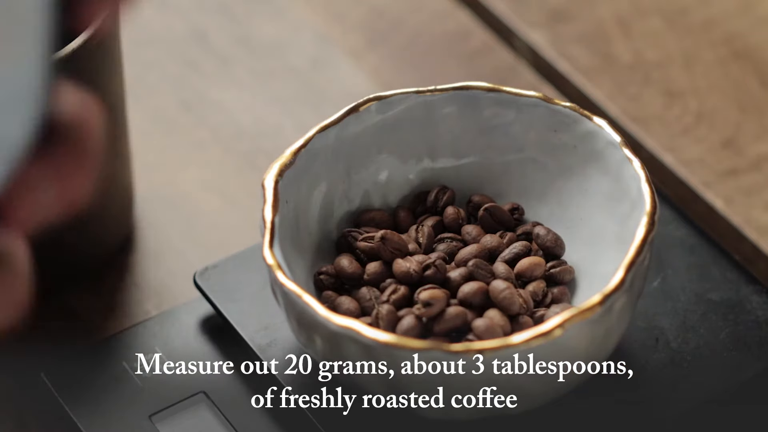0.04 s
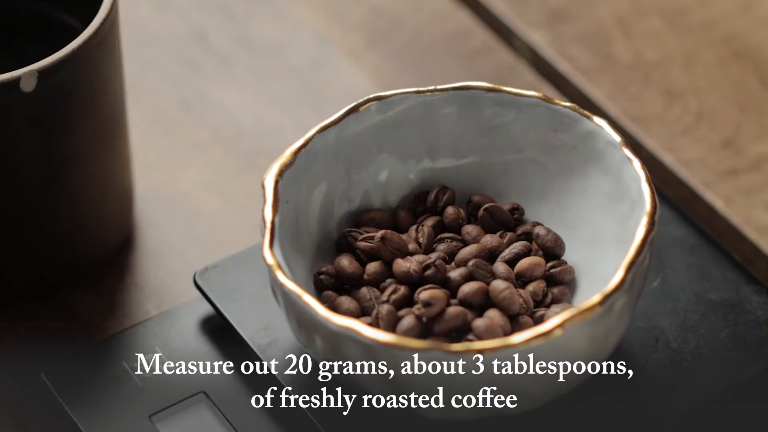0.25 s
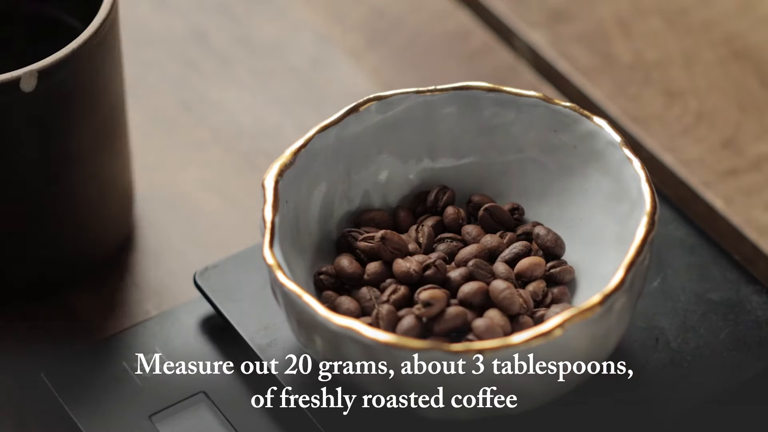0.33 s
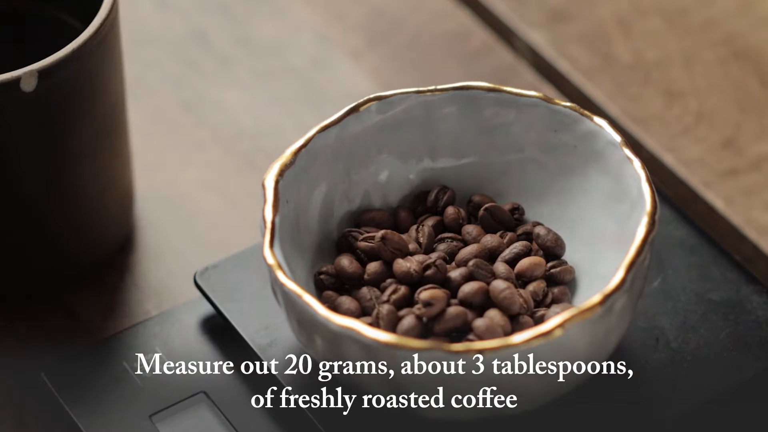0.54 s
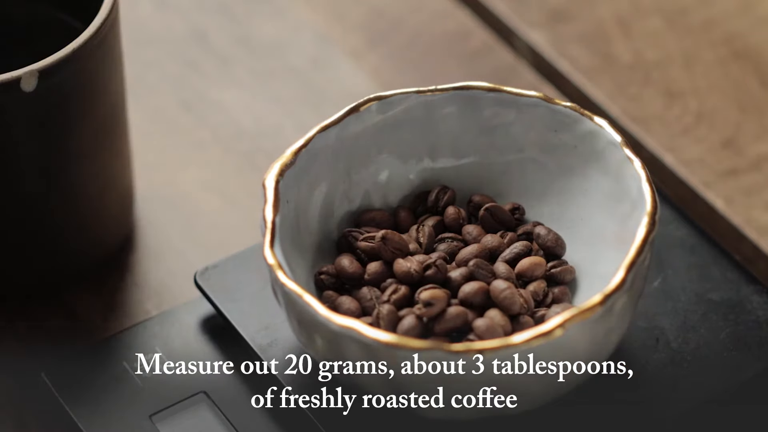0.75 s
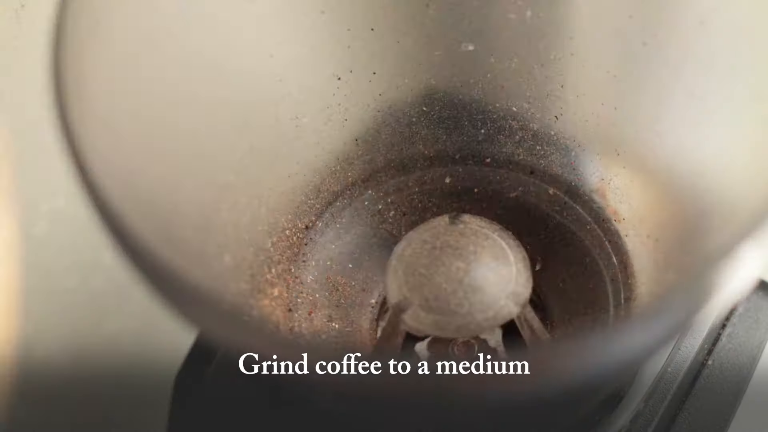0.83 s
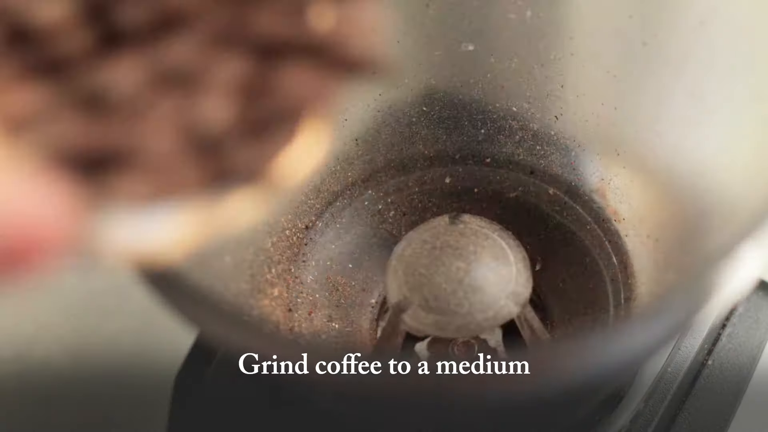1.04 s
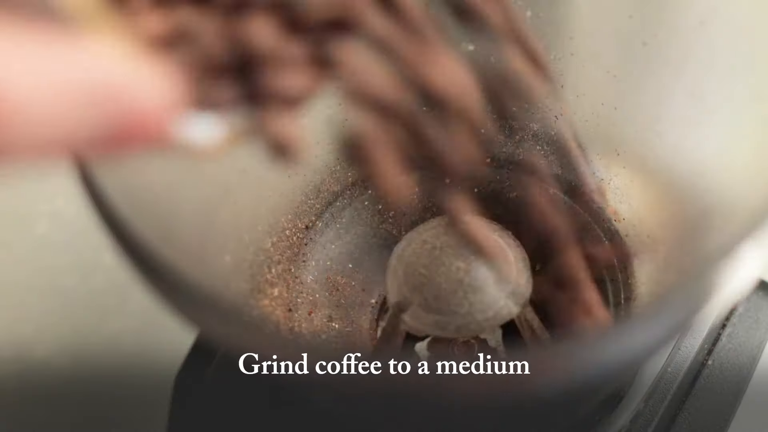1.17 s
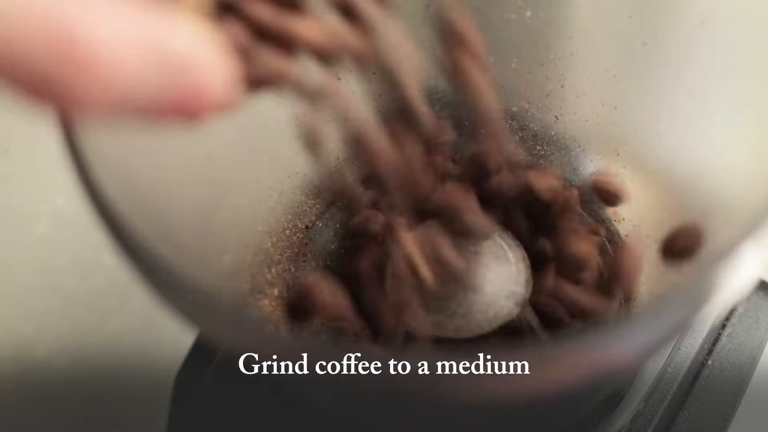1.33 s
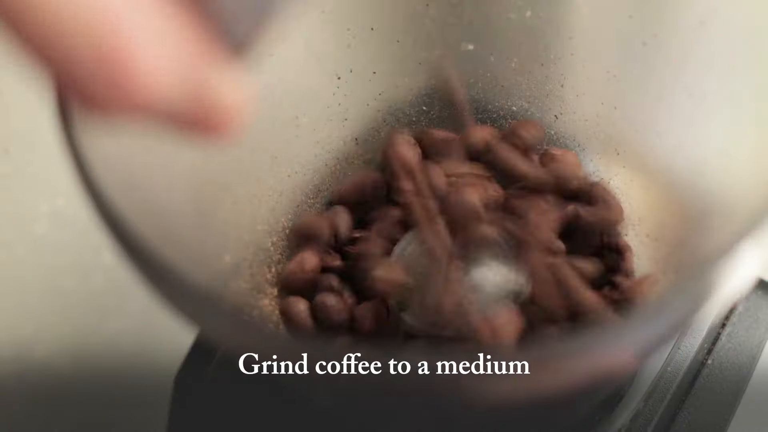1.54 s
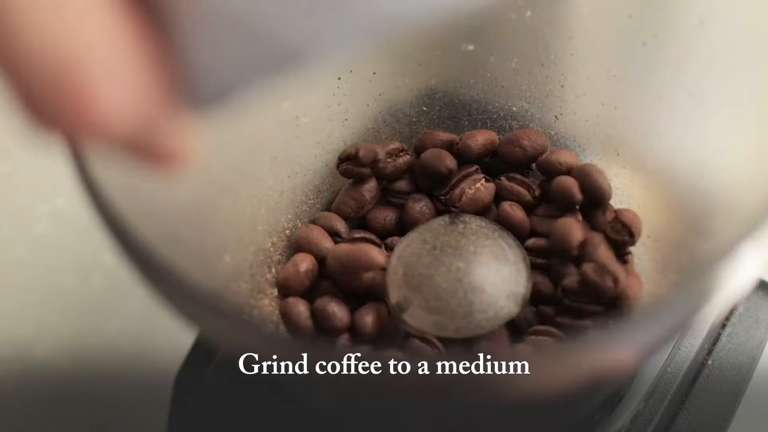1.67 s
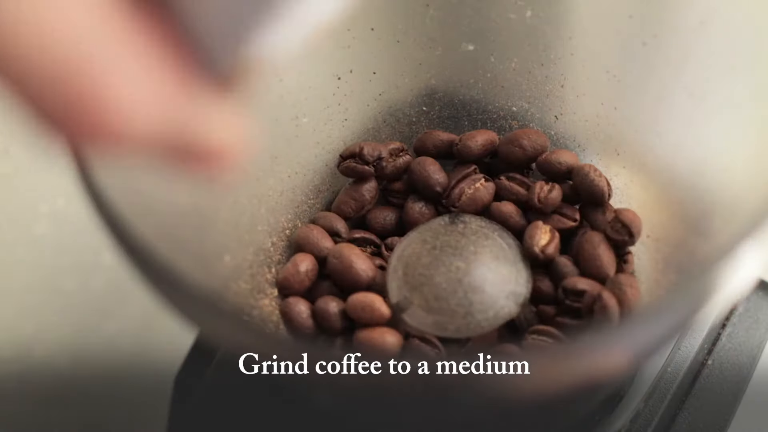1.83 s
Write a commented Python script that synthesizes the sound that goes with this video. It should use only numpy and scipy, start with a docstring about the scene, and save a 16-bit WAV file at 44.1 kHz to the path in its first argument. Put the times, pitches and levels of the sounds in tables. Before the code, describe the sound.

Coffee beans rattle dully in a canister, then clatter into a ringing metal grinder hopper.

```python
"""Roasted coffee beans slide and tumble inside a hand-held canister, close to the microphone in a small
kitchen: a dull, swelling rattle that is cut short. Then they creep over a tilting ceramic bowl and
pour into a metal grinder hopper, which rings with every bean until the heap settles.
Faint room tone lies under it all."""
import sys
import numpy as np
from scipy import signal
from scipy.fft import rfft, irfft, next_fast_len
from scipy.io import wavfile

SR = 44100
rng = np.random.default_rng(int(sys.argv[2]) if len(sys.argv) > 2 else 0)


def dump(signal):
    """Clip the signal to [-1, 1] and save it as 16-bit WAV at the path in sys.argv[1]."""
    limited = np.clip(np.atleast_2d(signal).T, -1, 1)
    pcm = np.round(limited * 32767).astype(np.int16)
    wavfile.write(sys.argv[1], SR, pcm)


N = 83790
TIME = np.arange(N) / SR


def amp(db):
    return 10 ** (np.asarray(db) / 20)


def unit_rms(x):
    return x / np.sqrt(np.mean(x ** 2) + 1e-20)


def along(points, hz):
    """Reads (Hz, value) points on a log frequency axis."""
    point_hz, values = np.transpose(points)
    return np.interp(np.log(hz + 1), np.log(point_hz + 1), values)


def levels(rows):
    """One gain per sample for each dB column after the time."""
    times, *columns = np.transpose(rows)
    return [amp(np.interp(TIME, times, db)) for db in columns]


def convolve(x, response):
    """Passes x through a response scaled to energy 1."""
    return signal.fftconvolve(x, response / np.linalg.norm(response))[:N]


def colour(x, spectrum, lo_hz=10, hi_hz=30000, size=4096, order=8):
    """Causal filter with the given spectrum between two edges."""
    hz = np.fft.rfftfreq(size, 1 / SR) + 1
    edges = np.sqrt((1 + (lo_hz / hz) ** order) * (1 + (hz / hi_hz) ** order))
    gain = amp(along(spectrum, hz)) / edges
    cepstrum = irfft(np.log(gain + 1e-6))
    cepstrum[1:size // 2] *= 2  # fold to minimum phase
    cepstrum[size // 2 + 1:] = 0
    return convolve(x, irfft(np.exp(rfft(cepstrum))))


def stream(per_s, spread_db):
    """Random contacts of uneven strength, rms 1."""
    touches = rng.random(N) < per_s / SR
    strength = amp(spread_db * np.minimum(rng.standard_normal(N), 2))
    return unit_rms(touches * strength)


def blows(rows):
    """One impulse for each (seconds, dB) row."""
    starts, db = np.transpose(rows)
    return np.bincount(np.round(starts * SR).astype(int), amp(db), N)[:N]


def bursts(contacts, life_s):
    """Each contact becomes its own tiny, decaying burst of noise."""
    decay = np.exp(-2 / (life_s * SR))
    energy = signal.lfilter([1 - decay], [1, -decay], contacts ** 2)
    return np.sqrt(energy) * rng.standard_normal(N)


def ring(contacts, modes, scatter_db, attack_s=0.00034):
    """Every contact starts decaying tones in new phases, with strengths varying by up to scatter_db."""
    t = np.arange(SR // 2) / SR
    onset = 1 - np.exp(-t / attack_s)
    out = np.zeros(N)
    for hz, db, t60 in modes:
        mode = np.exp(2j * np.pi * hz * t - np.log(1000) * t / t60) * onset
        strength = amp(scatter_db * (2 * rng.random(N) - 1))
        phase = np.exp(2j * np.pi * rng.random(N))
        out += amp(db) * np.sqrt(2) * convolve(contacts * strength * phase, mode).real
    return out / np.linalg.norm([amp(db) for _, db, _ in modes])


# Bands of a bean's click. Each row: lower edge in Hz, upper edge in Hz.
CLICK_BANDS = [(20, 4500), (4500, 7000), (7000, 9500), (9500, 12500), (12500, 20000)]

def bean_clicks(contacts, life_s, range_db):
    """Each bean's dry click has its own colour: every band gets a gain between 0 dB and range_db."""
    out = np.zeros(N)
    for band in CLICK_BANDS:
        noise = bursts(contacts * amp(range_db * rng.random(N)), life_s)
        out += signal.sosfilt(signal.butter(2, band, "band", fs=SR, output="sos"), noise)
    return out


# Beans sliding, close up. Each row: time in seconds, then relative mids, treble and lows in dB.
SLIDE_LEVELS = [(0.0, -47, -62, -53.5), (0.196, -31.5, -45.5, -39), (0.35, -26.5, -39, -33.5),
                (0.356, -20.5, -25.5, -32), (0.374, -20, -33.5, -30.5), (0.448, -17, -26, -35),
                (0.5, -18.5, -31, -24.5), (0.55, -23.5, -35, -39.5), (0.56, -15.5, -25.5, -24.5),
                (0.616, -31.5, -44, -38), (0.658, -26, -39.5, -35.5), (0.732, -45, -45.5, -64),
                (0.81, -38.5, -48.5, -46.5), (0.83, -49, -52, -71)]
# The rattle heard from just outside the canister. Each row: frequency in Hz, relative level in dB.
CANISTER_SPECTRUM = [(130, -41.5), (220, -15.5), (398, -8.5), (451, -9.5), (484, -5.5), (569, -5.5),
                     (891, -3.5), (1070, -3.5), (1250, -3), (1730, 0), (2610, -6), (3480, -4.5),
                     (4090, -11), (12000, -25.5), (16000, -30)]
# Brief mid-pitched tones in the rattle. Each row: frequency in Hz, relative level in dB, T60 in seconds.
RATTLE_TONES = [(330, -14, 0.093), (486, -11, 0.29), (891.5, -3.5, 0.13), (984.6, -9, 0.35),
                (1297, 6, 0.24), (1447, 0.5, .12), (1564, -19.5, 0.33), (1771, -1, 0.27), (1792, -6, 0.04),
                (2175, -1, 0.13)]

def canister_slide():
    """Sliding beans make a dense, dull rattle, coloured by brief tones, with bright ticks on top."""
    mids, treble, lows = levels(SLIDE_LEVELS)
    contacts = stream(per_s=1500, spread_db=2.5)
    grains = bursts(contacts, life_s=0.0003)
    ticks = unit_rms(bean_clicks(stream(per_s=1200, spread_db=4), life_s=0.0012, range_db=-4))
    out = amp(-1) * colour(grains * mids, CANISTER_SPECTRUM, lo_hz=498, hi_hz=4570)
    out += amp(0.5) * colour(ticks * treble, CANISTER_SPECTRUM, lo_hz=4270)
    out += amp(-1.5) * colour(grains * lows, CANISTER_SPECTRUM, lo_hz=235, hi_hz=497)
    return out + amp(-10.5) * ring(contacts * mids, RATTLE_TONES, scatter_db=3)


# The hand on the canister, near the microphone. Each row: time in seconds, level in dB.
HAND_LEVELS = [(0.0, -48), (0.184, -52.5), (0.202, -42.5), (0.426, -50), (0.464, -42.5), (0.758, -52),
               (0.83, -42)]
# Its rumble. Each row: frequency in Hz, relative level in dB.
HAND_SPECTRUM = [(20, -16.5), (45, -12.5), (68, -1), (120, -6), (165, -11), (228, 0), (290, -15),
                 (500, -43.5)]

def hand_rumble():
    """The hand moving the canister makes a low, uneven rumble."""
    return levels(HAND_LEVELS)[0] * colour(rng.standard_normal(N), HAND_SPECTRUM)


# The quiet kitchen behind the beans. Each row: frequency in Hz, relative level in dB.
ROOM_SPECTRUM = [(15, -31), (30, -11.5), (60, -2), (90, -7), (120, -3.5), (150, -10), (190, -5.5),
                 (250, -11), (400, -21.5), (800, -19.5), (2000, -23), (6000, -29), (16000, -36.5)]
# Its level at the microphone. Each row: time in seconds, level in dB.
ROOM_LEVELS = [(.85, -70.5), (1.25, -68.5), (1.7, -78.5), (1.9, -72)]

def room_tone():
    """Faint, low noise that dips as the pour ends."""
    return levels(ROOM_LEVELS)[0] * colour(rng.standard_normal(N), ROOM_SPECTRUM)


# The small kitchen's decay. Each row: frequency in Hz, T60 in seconds.
KITCHEN_DECAY = [(200, .3), (2000, 0.32), (6000, 0.12), (14000, 0.097)]

def kitchen(direct, wet_db=-11, delay_s=0.002):
    """At close range the direct sound leads; the room adds a short answer whose treble dies first."""
    hz, t, spectra = signal.stft(rng.standard_normal(SR // 2), SR, nperseg=256)
    decay = np.exp(-np.log(1000) * t / along(KITCHEN_DECAY, hz)[:, None])
    _, tail = signal.istft(spectra * decay, SR, nperseg=256)
    return direct + amp(wet_db) * convolve(direct, np.pad(tail, (round(delay_s * SR), 0)))


# Knocks inside the canister. Each row: start in seconds, relative level in dB, pitch in Hz.
CANISTER_KNOCKS = [(.080, -21.5, 1730), (0.177, -21, 3900), (0.202, -14, 1620), (0.296, -23, 2920),
                   (0.322, -17, 6000), (0.3592, -8.5, 5700), (0.3591, -2, 7560), (0.3714, -17, 4570),
                   (0.4085, -4, 2170), (0.4222, -5.5, 3000), (0.4369, -5.5, 1500), (.445, -4.5, 2200),
                   (0.4787, -2, 1530), (0.4914, -0.5, 1370), (0.494, -1, 2000), (0.5041, -2, 2170),
                   (0.529, -8, 6000), (0.5611, -5.5, 1470), (0.5617, 0, 3000), (0.567, -16, 1190),
                   (.6095, -19, 2000), (0.64, -21, 1800), (0.657, -29, 1780), (0.671, -19, 2600),
                   (0.7177, -12, 1640), (0.8036, -17, 1970)]

def canister_knocks(decay_cycles=0.93, gain_db=-1):
    """Single beans strike the wall harder: a heavily damped tone with a little noisy crack."""
    t = np.arange(SR // 50) / SR
    out = np.zeros(N)
    for start, db, hz in CANISTER_KNOCKS:
        crack = amp(-22.5) * rng.standard_normal(len(t))
        knock = (np.sin(2 * np.pi * hz * t) + crack) * np.exp(-hz * t / decay_cycles)
        out[round(start * SR):][:len(t)] += amp(db + gain_db) * knock
    return signal.sosfilt(signal.butter(2, 300, "high", fs=SR, output="sos"), out)


# Beans creeping over the bowl, faint even up close. Each row: time in seconds, relative level in dB.
CREEP_LEVELS = [(.85, -99), (.98, -79), (1.08, -62), (1.15, -59.5), (1.2, -63.5), (1.26, -55), (1.4, -75)]
# Single beans tapping it. Each row: start in seconds, relative level in dB.
BOWL_TAPS = [(1.1095, -35), (1.1425, -26.5), (1.163, -33), (1.179, -24), (1.2415, -35)]
# The ceramic's ring. Each row: frequency in Hz, relative level in dB, T60 in seconds.
BOWL_MODES = [(1551, -7.5, 0.035), (2740, 4.5, 0.069), (2945, -17, 0.044), (5420, -5.5, 0.057)]
# The tick of bean on ceramic. Each row: frequency in Hz, relative level in dB.
TICK_SPECTRUM = [(200, 0.5), (700, -16), (1600, -5), (4000, 0), (8000, -5), (16000, -10)]

def bowl_creep():
    """Beans start to creep and tap the tilting ceramic, which rings faintly."""
    contacts = levels(CREEP_LEVELS)[0] * stream(per_s=700, spread_db=3.5) + blows(BOWL_TAPS)
    ceramic = amp(-5.5) * ring(contacts, BOWL_MODES, scatter_db=3.5)
    ticks = amp(-7) * colour(bursts(contacts, life_s=0.0015), TICK_SPECTRUM)
    return ceramic + ticks


# The stream landing in the hopper, close up. Each row: time in seconds, relative level in dB.
POUR_LEVELS = [(1.256, -81), (1.26, -30), (1.31, -23.5), (1.355, -28.5), (1.38, -21), (1.43, -31.5),
               (1.48, -30), (1.57, -29.5), (1.61, -31), (1.66, -35.5), (1.70, -45), (1.76, -59.5),
               (1.80, -62), (1.84, -66), (1.857, -54), (1.9, -84)]
# Beans hitting bare metal. Each row: start in seconds, relative level in dB, offset of the crack in dB.
METAL_HITS = [(1.2582, -5, 8), (1.2625, 3, 2.5), (1.268, -10, -5), (1.2795, -1, 3.5), (1.286, -8, 0),
              (1.2965, -1.5, 8), (1.306, -0.5, 1.5), (1.3105, -12, -5), (1.3285, -2, 2), (1.332, 0, -6),
              (1.336, 2, -9), (1.342, -12, -5), (1.349, -4, -3), (1.373, -5, 2), (1.4145, -4.5, -5),
              (1.4375, -4.5, -3), (1.4675, -1.5, -3.5), (1.4745, -11.5, 2), (1.4895, -4, -1),
              (1.497, 2.5, -12), (1.512, -12, -3), (1.531, -4, -10), (1.554, -1, -14), (1.563, -1, -1.5),
              (1.569, -6, -5), (1.5925, -4.5, -8), (1.617, -2, 2.5), (1.637, -18, 2), (1.6495, -7, 3.5),
              (1.668, -14, -1), (1.678, -21, 7), (1.7215, -22.5, 0), (1.728, -26.5, -2),
              (1.7755, -38.5, 8.5), (1.809, -38, -11), (1.8598, -22.5, -5), (1.875, -51, -2),
              (1.89, -37, -8)]
# The crack of a landing bean. Each row: frequency in Hz, relative level in dB.
CRACK_SPECTRUM = [(30, -35), (130, -24), (280, -8.5), (600, -10), (1100, -13), (2000, -11.5), (3200, 14),
                  (5000, 10.5), (6500, 6), (9000, 5.5), (12000, 1), (16000, -2)]
# The metal around the burr. Each row: frequency in Hz, relative level in dB, T60 in seconds.
HOPPER_MODES = [(2333, -22.5, 0.062), (2778, -9.5, 0.056), (3090, -10, 0.021), (3217, 3, 0.035),
                (3327, 1.5, 0.049), (3515, -2.5, 0.013), (3543, -3, 0.026), (3750, -5, 0.055),
                (4535, -8, 0.019), (4707, -6, 0.026), (4880, -6, .02), (5410, -12, 0.023),
                (8230, -10, 0.016), (9410, -10.5, 0.014)]

def hopper_pour(hit_db=3.5, settled_s=1.79, dull_above_hz=6400):
    """Each landing bean cracks and rings the metal; the last gentle touches of the heap are dull."""
    pour = amp(-2) * levels(POUR_LEVELS)[0] * stream(per_s=440, spread_db=1.5)
    hits = amp(hit_db) * blows([(start, db) for start, db, _ in METAL_HITS])
    sharp_hits = amp(hit_db) * blows([(start, db + crack_db) for start, db, crack_db in METAL_HITS])
    clicks = bean_clicks(pour, life_s=0.0029, range_db=6)
    clicks += amp(-1.5) * bean_clicks(sharp_hits, life_s=0.0035, range_db=3)
    cracks = amp(-6.5) * colour(clicks, CRACK_SPECTRUM)
    metal = amp(-1) * ring(pour + hits, HOPPER_MODES, scatter_db=6)
    bright = cracks + metal
    dull = signal.sosfilt(signal.butter(2, dull_above_hz, fs=SR, output="sos"), bright)
    return np.where(TIME < settled_s, bright, dull)


# Beans sliding down the hopper's flared wall. Each row: time in seconds, level in dB.
WALL_LEVELS = [(1.26, -90), (1.29, -48), (1.35, -46.5), (1.45, -52.5), (1.51, -46), (1.57, -50.5),
               (1.64, -53), (1.69, -66.5), (1.75, -89)]
# That wall's low modes. Each row: frequency in Hz, relative level in dB, T60 in seconds.
WALL_MODES = [(834, -19, .12), (1252, -9, .13), (1420, 0, .16)]

def hopper_wall():
    """The wall hums under the many small contacts of sliding beans."""
    contacts = levels(WALL_LEVELS)[0] * stream(per_s=810, spread_db=-3)
    return ring(contacts, WALL_MODES, scatter_db=0)


# Bumps on the grinder's body. Each row: start in seconds, relative level in dB.
BODY_BUMPS = [(1.384, -18), (1.789, -42)]
# Their thud at close range. Each row: frequency in Hz, relative level in dB.
THUD_SPECTRUM = [(30, -12), (100, -5), (170, -10), (260, -3), (400, -2), (540, 0), (700, -7), (850, -5),
                 (1200, -18), (4000, -60)]

def grinder_bumps():
    """The body takes two soft bumps, each a short, low thud."""
    return colour(bursts(blows(BODY_BUMPS), life_s=0.015), THUD_SPECTRUM)


def scene(cut_s=0.832):
    """One close microphone in the kitchen: the canister, then a hard cut to the bowl and grinder."""
    room = room_tone()
    tumbling = kitchen(canister_slide() + canister_knocks()) + hand_rumble()
    pouring = kitchen(bowl_creep() + hopper_pour() + hopper_wall() + grinder_bumps())
    return (np.where(TIME < cut_s, tumbling, pouring) + room)[None]


def record(dry):
    """The microphone's signal falls off steeply above the band limit."""
    top_hz = 16000
    size = next_fast_len(N + SR // 2)
    gain = 1 / (1 + (np.fft.rfftfreq(size, 1 / SR) / top_hz) ** 160)
    return irfft(rfft(dry, size) * gain, size)[..., :N]


dry = scene()
out = record(dry)
dump(out)
```